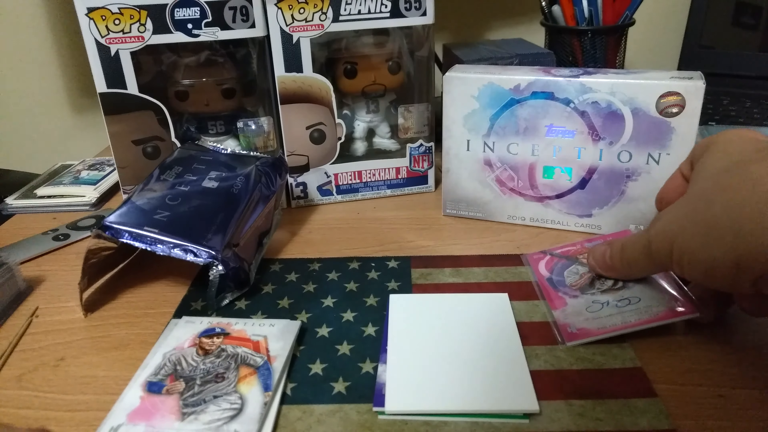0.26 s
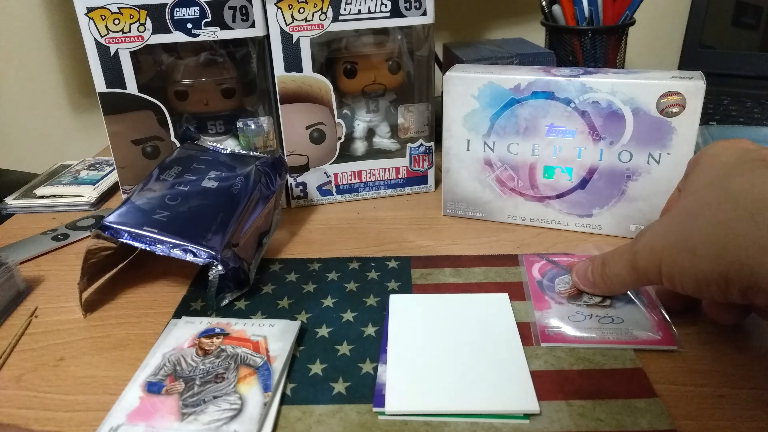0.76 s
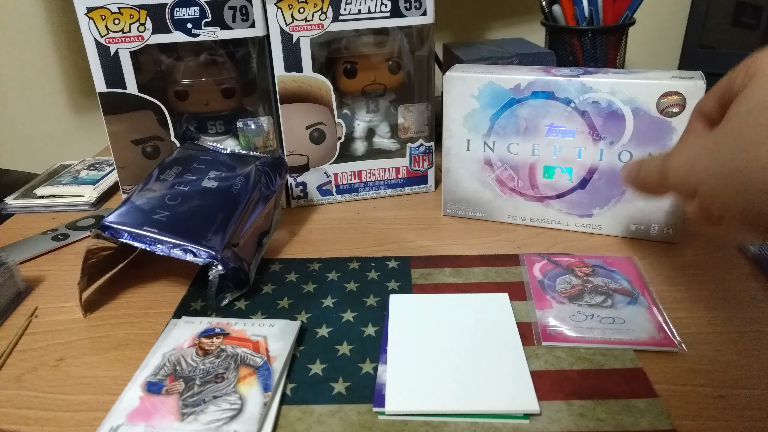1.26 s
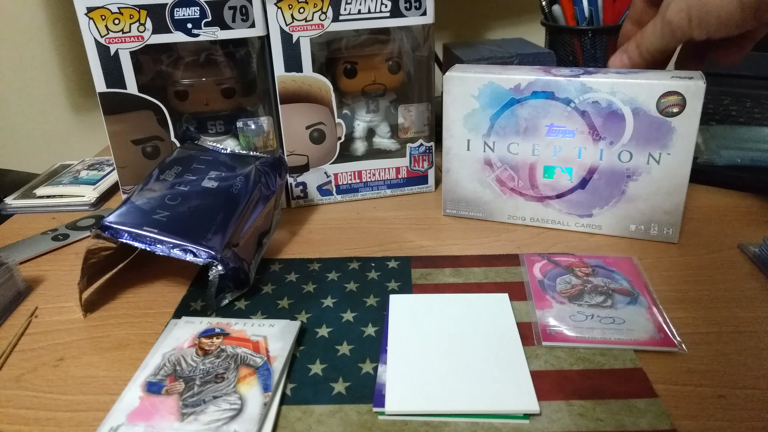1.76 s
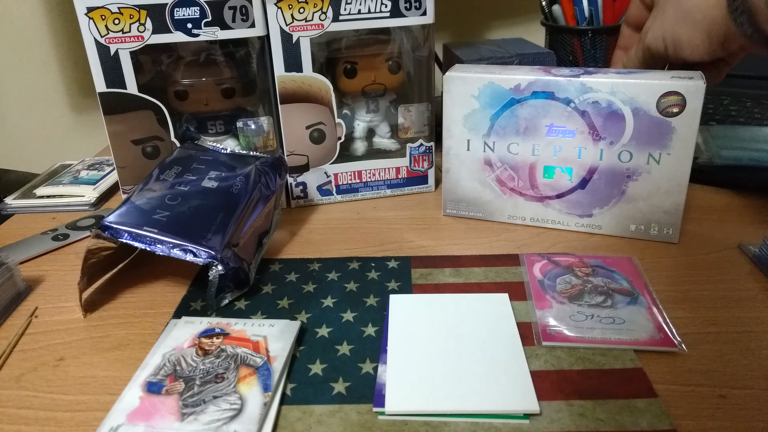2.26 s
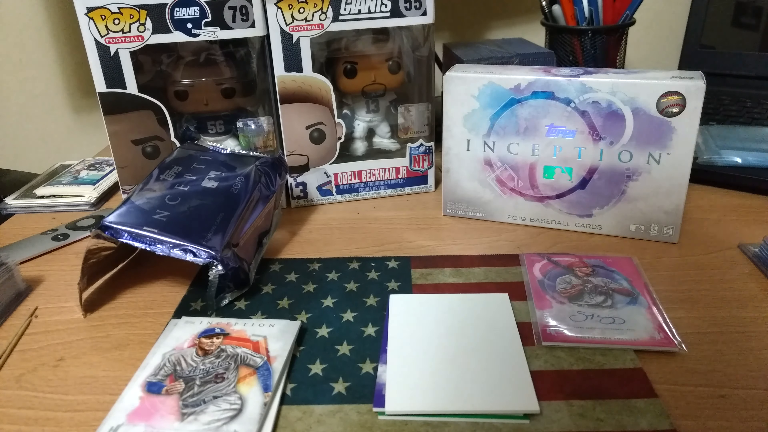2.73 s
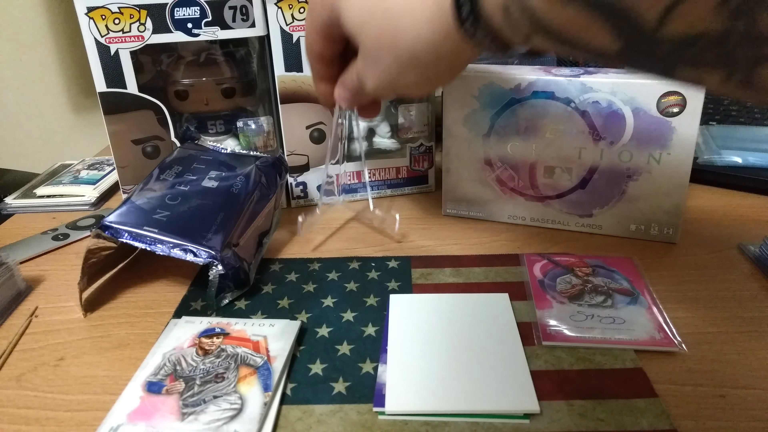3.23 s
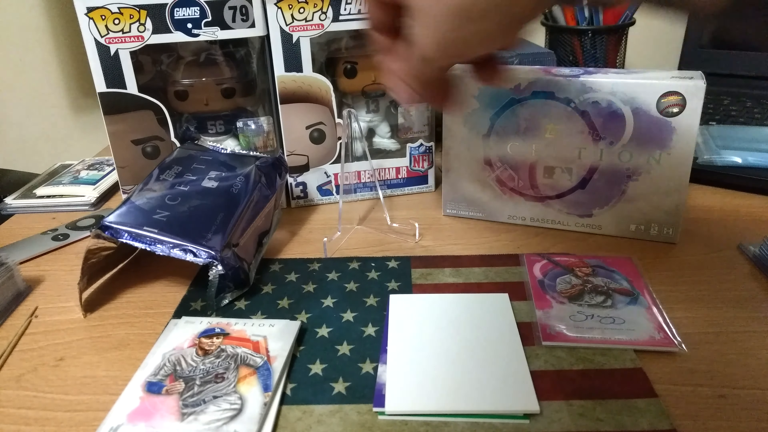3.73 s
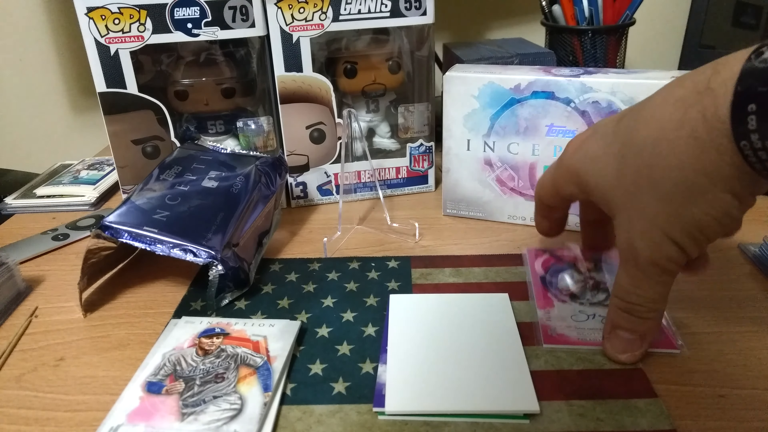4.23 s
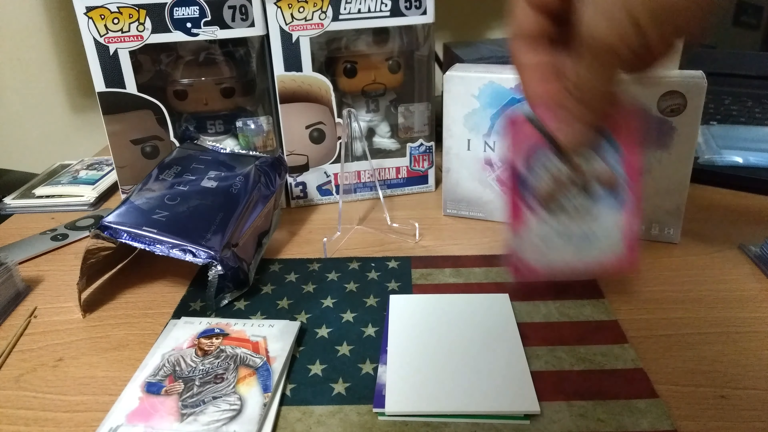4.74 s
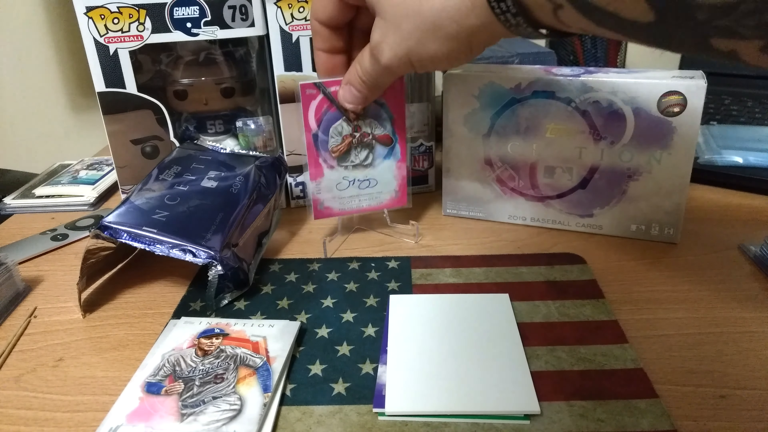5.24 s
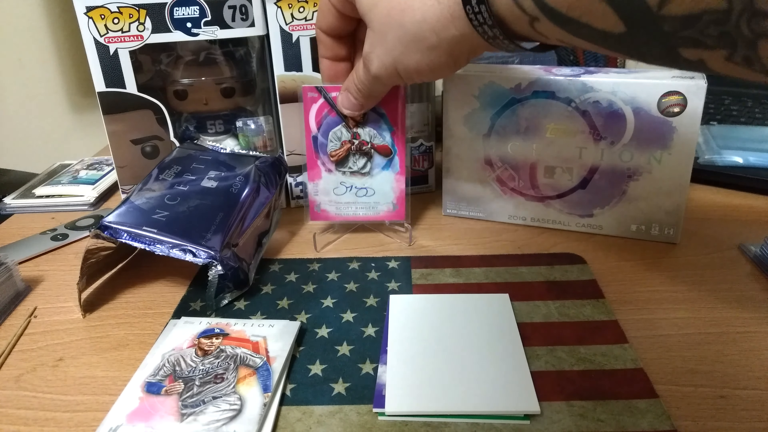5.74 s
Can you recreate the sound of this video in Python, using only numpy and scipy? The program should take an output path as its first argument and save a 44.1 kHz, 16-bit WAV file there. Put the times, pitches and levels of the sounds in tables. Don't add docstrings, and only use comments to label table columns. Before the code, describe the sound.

Quiet film rustles and snaps, dull cardboard bumps, hard plastic clacks and short drags on a desk, over a low fan hum.

```python
import sys
import numpy as np
from scipy import signal
from scipy.fft import rfft, irfft
from scipy.io import wavfile

SR = 44100
rng = np.random.default_rng(int(sys.argv[2]) if len(sys.argv) > 2 else 0)


def field_ratio(decibels):
    return 10 ** (np.asarray(decibels, dtype=float) / 20)


def master_out(mix):
    frames = np.transpose(np.atleast_2d(mix))
    ceiling = np.clip(frames, -1, 1)
    pcm = np.round(ceiling * 32767).astype(np.int16)
    wavfile.write(sys.argv[1], SR, pcm)


N = 264246


def rms_one(x):
    return x / np.sqrt(np.mean(x ** 2) + 1e-20)


def band(x, low_hz, high_hz):
    edges_hz = [low_hz, min(high_hz, .45 * SR)]
    return signal.sosfilt(signal.butter(2, edges_hz, "band", fs=SR, output="sos"), x)


def twins(alike):
    first, other = rng.standard_normal((2, N))
    alike = np.clip(alike, 0, 1)
    return np.array([first, alike * first + np.sqrt(1 - alike ** 2) * other])


def grains(per_s, spread_db):
    sizes = field_ratio(spread_db * np.minimum(rng.exponential(1, N), 4))
    sizes = sizes * rng.choice([-1, 1], N)
    return rms_one(sizes * (rng.random(N) < per_s / SR))


def ring(force, hz, t60):
    r, w = field_ratio(-60 / (t60 * SR)), 2 * np.pi * hz / SR
    return signal.lfilter([0, np.sin(w)], [1, -2 * r * np.cos(w), r * r], force + 1e-18)


def clicks(times, gains):
    out = np.zeros(N)
    out[(np.asarray(times) * SR).astype(int)] = gains
    return out


def bursts(times, levels_db, t60, alike=.9):
    starts = clicks(times, field_ratio(levels_db)) + 1e-18
    envelope = signal.lfilter([1], [1, -field_ratio(-60 / (t60 * SR))], starts)
    return envelope * twins(alike)


def in_time(spans):
    rows = []
    for span in spans:
        first, last = span[0], span[-1]
        rows += [(first[0] - .004, -120, *first[2:]), *span, (last[0] + .012, -120, *last[2:])]
    s, *columns = np.transpose(rows)
    return [np.interp(np.arange(N) / SR, np.maximum.accumulate(s), c) for c in columns]


def strokes(peak_s, swell_s, fade_s, peak_db):
    edge_db, roundness = 20, 1.17
    power, t = np.full(N, 1e-14), np.arange(N) / SR
    for s, swell, fade, db in zip(peak_s, swell_s, fade_s, peak_db):
        near = slice(max(int((s - 2 * swell) * SR), 0), int((s + 2 * fade) * SR))
        away = np.maximum((s - t[near]) / swell, (t[near] - s) / fade)
        power[near] += field_ratio(2 * (db - edge_db * away ** roundness))
    return 10 * np.log10(power)


def body(modes, times, hits_db, rub_db, slips, chatter_s):
    chatter = rng.standard_normal((len(times), 600)) * field_ratio(-60 * np.arange(600) / SR / chatter_s)
    chatter[:, 0] = 7
    blows = np.zeros(N)
    for s, db, shape in zip(times, hits_db, chatter):
        start = int(s * SR)
        blows[start:start + 600] += field_ratio(db) * shape / np.sqrt(np.sum(shape ** 2))
    even = np.sqrt(sum(field_ratio(2 * db) * t60 * SR / (4 * np.log(1000)) for hz, db, t60 in modes))
    force = band(blows + slips * field_ratio(rub_db) / even, .6 * modes[0][0], 1.4 * modes[-1][0])
    return sum(field_ratio(db) * (-1) ** k * ring(force, hz, t60) for k, (hz, db, t60) in enumerate(modes))


# freq_hz, level_db (per Hz)
AIR_SPECTRUM = [(25, -26), (55, 6.5), (130, -2), (300, -4), (700, -6.5), (1200, -11), (2000, -15.5),
                (4000, -20.5), (8000, -27.5), (11000, -28.5), (15500, -23.5)]
# centre_hz, width_hz, level_db
FAN_HUMS = [(59.4, 5, -80), (126, 20, -66), (207.4, 10.3, -60), (259.7, 28.5, -61.5), (475, 7.3, -82.5)]


def room_tone():
    hz, table = np.fft.rfftfreq(N, 1 / SR) + 1, np.array(AIR_SPECTRUM)
    colour = field_ratio(np.interp(np.log(hz), np.log(table[:, 0]), table[:, 1]))
    first, other = rfft(twins(0.22))
    shared = .5 / (1 + (hz / 500) ** 4)
    pair = [first, shared * first + np.sqrt(1 - shared ** 2) * other]
    out = field_ratio(-58) * rms_one(irfft(pair * colour, N))
    for centre_hz, width_hz, db in FAN_HUMS:
        out += field_ratio(db) * rms_one(ring(twins(0.77), centre_hz, np.log(1000) / (np.pi * width_hz)))
    return out


# firmest_s, swell_s, fade_s, peak_db, dullness_db
FILM_RUBS = [(.172, .02, .018, -62.5, -0.5), (.274, 0.11, 0.043, -59.5, -5.5),
             (.442, 0.11, 0.06, -66.5, -2), (.565, 0.063, .05, -61.5, -2.5),
             (.632, 0.11, .045, -59.5, -1.5), (.847, 0.008, 0.034, -58.5, -2.5),
             (.938, 0.02, 0.0055, -52, 4), (.955, .015, .09, -75, 8), (1.66, 0.36, 0.3, -75, 3.5),
             (2.272, .012, 0.034, -68, 2), (3.33, 0.2, 0.092, -74, 5.5), (4.09, 0.017, .05, -63.5, -7),
             (4.25, .03, 0.027, -69.5, -3), (4.395, .04, 0.14, -56.5, 0), (4.431, 0.023, 0.014, -41.5, -7),
             (4.509, 0.15, 0.05, -49.5, -10.5), (4.62, 0.32, .12, -63, -9), (4.694, 0.061, .008, -53, -8.5),
             (4.71, 0.0044, 0.0099, -48, -12), (5.045, 0.04, 0.024, -62, -3), (5.556, 0.074, .045, -67, -2),
             (5.88, .012, .07, -79, -11)]
# start_s, peak_db, top_db and lower_db (both relative to peak)
FILM_SNAPS = [(0.127, -59.5, 17, 8), (0.1681, -51.5, -6, 7), (0.1774, -56, -7, -1),
              (0.206, -48.5, -12, -14), (0.216, -51, 1, -12), (0.242, -48, 1, -17), (0.26, -51, 2, -12),
              (0.2717, -45, -1, -25), (0.2935, -44, -18, -21), (0.3084, -58, -12, -11), (0.844, -62, 0, -3),
              (0.867, -62, -7, 15.5), (0.9104, -55, 4, -4), (0.9373, -41, 3, -23), (1.192, -53, 8, 12),
              (4.078, -57, 8, 3), (4.1043, -48.5, -8, -0.5), (4.1504, -53, -10, -3), (4.335, -62, -1, 0),
              (4.346, -54, -4, -4), (4.37, -35, 1, -3.5), (4.39, -44.5, -10, 9), (4.4316, -39.5, -5, 7),
              (4.699, -52, -3, -7), (4.708, -41.5, 6.5, -3), (5.48, -61, 12, 0), (5.7892, -58, 3, 7),
              (5.832, -54, -10, -4), (5.8402, -42.5, 2, 6.5), (5.8639, -38.5, 9.5, 6.5)]


def sleeve():
    *when, grip_db, dull_db = np.transpose(FILM_RUBS)
    fine_db, lower_db = strokes(*when, grip_db), strokes(*when, grip_db + dull_db)
    hiss_db = fine_db - 8
    slips = .5 * grains(2500, spread_db=4.5) + twins(.85)
    rub = -field_ratio(hiss_db + 3) * rms_one(band(slips, 7800, 11500))
    rub += field_ratio(fine_db + 6) * rms_one(band(slips, 11500, 19000))
    rub += field_ratio(lower_db + 3) * rms_one(band(slips, 3000, 7800))
    s, peak_db, top_db, low_db = np.transpose(FILM_SNAPS)
    snap = band(bursts(s, peak_db + 8, t60=.008, alike=.97), 6000, 11500)
    snap += band(bursts(s, peak_db + top_db + 9, t60=.008, alike=.97), 11500, 19000)
    snap += band(bursts(s, peak_db + low_db + 5.0, t60=0.0098), 700, 4500)
    return rub + snap


# start_s, pitch_hz, level_db
SQUEAK_GLIDES = [
    [(2.263, 6100, -75), (2.272, 6050, -48), (2.285, 5950, -59), (2.294, 5720, -50), (2.305, 5700, -68),
     (2.316, 5680, -61), (2.35, 5650, -76)],
    [(.49, 14000, -80), (.52, 14300, -74), (.55, 14800, -61), (.58, 15000, -77)],
]


def squeaks():
    spans = [[(s, db, hz) for s, hz, db in rows] for rows in sorted(SQUEAK_GLIDES)]
    level_db, hz = in_time(spans)
    waver, grip = rms_one(signal.lfilter([1], [1, -.95], rng.standard_normal((2, N))))
    phase = 2 * np.pi * np.cumsum(hz + 120 * waver) / SR
    octave = field_ratio(-3.5) * (4 * hz < SR) * np.sin(2 * phase)
    return field_ratio(level_db + 3.5 + 2.6 * grip) * (np.sin(phase) + octave)


# start_s, board_db, grit_db (relative to board)
CARTON_SCRAPE = [
    (1.958, -35, -3),
    (2.016, -38.5, -15),
    (2.026, -46.5, -7),
    (2.086, -66, -9),
    (2.102, -49, -25),
    (2.13, -70, -11),
]
# start_s, peak_db
CARTON_KNOCKS = [
    (1.959, -31),
    (1.978, -30),
    (2.002, -30),
    (2.02, -40),
]
# freq_hz, level_db, t60_s
PANEL_MODES = [(240, -21, 0.053), (412, -4, 0.15), (679.6, -4, 0.086), (1057, 0, 0.044), (1350, 4.5, 0.013),
               (1660, -4, 0.021), (2820, -6, 0.012), (4080, -1, 0.0074), (5450, -11, 0.017),
               (6250, -17, 0.022)]


def carton():
    s, peak_db = np.transpose(CARTON_KNOCKS)
    board_db, grit_db = in_time([CARTON_SCRAPE])
    slips = grains(4000, spread_db=3)
    panels = body(PANEL_MODES, s, peak_db - 9, board_db - 1.5, slips, chatter_s=.01)
    rumble = field_ratio(board_db - 6) * rms_one(band(twins(0.68), 145, 3700))
    grit = field_ratio(board_db + grit_db - 1.0) * rms_one(band(slips + twins(0.27), 2300, 19500))
    crack = band(bursts(s, peak_db - 5.0, t60=0.014), 2100, 25000)
    return panels + rumble + grit + crack


# start_s, base_peak_db, frame_db, tips_db, crack_db
EASEL_KNOCKS = [(2.102, -40.5, -63, -76, -70), (2.361, -31.5, -43, -31, -35.5),
                (2.373, -39, -51, -31.5, -40.5), (3.3714, -19, -35, -30.5, -60),
                (3.394, -29, -36, -31, -58), (3.4399, -25, -39, -45, -59), (3.4475, -22.5, -28, -49, -59),
                (3.558, -36.5, -44, -64, -64), (3.593, -26.5, -31, -54, -63), (3.605, -40, -42, -56, -64),
                (5.483, -36, -48, -72, -70), (5.648, -27, -36.5, -66, -66), (5.667, -28, -33, -65, -53.5),
                (5.675, -26, -29.5, -68, -59), (5.698, -33, -45, -67, -61)]
# firmest_s, swell_s, fade_s, peak_db, legs_db
EASEL_STROKES = [(2.386, 0.0066, .05, -58, -6), (3.404, 0.013, 0.025, -36.5, -12.5),
                 (3.429, 0.057, 0.013, -37.5, -19), (3.457, .005, .03, -60, -18),
                 (3.568, 0.014, .025, -42, -33), (3.61, 0.0076, 0.022, -42.5, -22),
                 (4.433, .01, .008, -52, -20), (5.488, 0.01, 0.012, -42, -40),
                 (5.532, 0.013, 0.017, -48, -26), (5.549, .006, 0.038, -41, -12),
                 (5.575, .04, 0.018, -49, -7), (5.6, 0.037, 0.01, -46.5, -7), (5.681, .006, 0.03, -33.5, -29)]
# freq_hz, level_db, t60_s
BASE_MODES = [(300, -16, .04), (458, -15, .05), (640, -6, .025), (730, -1, .04), (870, -1, .04),
              (1007, -2, .025)]
FRAME_MODES = [(1290, -4, .025), (1435, -1, .04), (1717, -5, .06), (1895, -4, .045), (2137, -7, .045),
               (2300, -12, .02)]
LEG_MODES = [(2550, -10, .03), (3175, -2, .03), (3300, -3, .028), (3560, -7, .016), (3910, -8, .018)]
TIP_MODES = [(4750, -5, .01), (5230, -6, .085), (5600, -8, .012), (6400, -20, .035), (9150, -22, .03),
             (10870, -24, .045)]


def easel():
    low_side_db = -5.5
    s, base_db, frame_db, tips_db, crack_db = np.transpose(EASEL_KNOCKS)
    legs_db = crack_db - 4.5
    *when, grip_db, share_db = np.transpose(EASEL_STROKES)
    low_db, high_db = strokes(*when, grip_db), strokes(*when, grip_db + share_db)
    slips = grains(3000, spread_db=4)
    # modes, knock dB, drag dB, gain dB (in sum and difference)
    parts = [(BASE_MODES, base_db, low_db, [[-5], [low_side_db - 4.5]]),
             (FRAME_MODES, frame_db, low_db - 6.5, [[0], [low_side_db]]),
             (LEG_MODES, legs_db, high_db, 2),
             (TIP_MODES, tips_db, high_db - 18, 0)]
    rings = np.zeros((2, N))
    for modes, knock_db, drag_db, gain_db in parts:
        rings += field_ratio(gain_db) * body(modes, s, knock_db + 3.0, drag_db + 4.5, slips, chatter_s=.003)
    crack = band(bursts(s, crack_db + 7, t60=.03), 6000, 17000)
    crack += band(bursts(s, np.maximum(legs_db, tips_db) + 3, t60=.03), 2400, 6500)
    thud = band(bursts(s, frame_db + 8, t60=.022, alike=.95), 500, 2200)
    thud += band(clicks(s, field_ratio(base_db + 17.5)), 520, 1780)
    return rings + crack + thud * field_ratio([[0], [low_side_db]])


def room(x):
    t60_s, wet_db, wall_cut_hz = 0.17, -15, 9400
    t = np.arange(SR // 2) / SR
    tail = rng.standard_normal((2, len(t))) * field_ratio(-60 * t / t60_s) * (t > .003)
    tail = signal.sosfilt(signal.butter(1, wall_cut_hz, fs=SR, output="sos"), tail)
    tail = field_ratio(wet_db) * tail / np.sqrt(np.sum(tail[0] ** 2))
    return signal.fftconvolve(x, tail, axes=1)[:, :N]


def scene():
    desk = sleeve() + squeaks() + carton() + easel()
    return desk + room(desk) + room_tone()


CONVERTER_OFFSET = [
    [.00776],
    [-.0003],
]


def roll_off(x):
    return signal.sosfilt(signal.butter(12, 16700, fs=SR, output="sos"), x)


def record(dry):
    comb_hz = 2211
    left_top_cut_hz, right_bass_cut_hz = 6300, 175
    hz = np.fft.rfftfreq(N, 1 / SR)
    left = -np.exp(-2j * np.pi * hz / comb_hz) / (1 + (hz / left_top_cut_hz) ** 2)
    pitch = 1j * hz / right_bass_cut_hz
    right = pitch ** 2 / (1 + 1.5 * pitch + pitch ** 2)
    mid = irfft(rfft(dry[0]) * (left + right) / 2, N)
    side = irfft(rfft(dry[1]) * (left - right) / 2, N)
    whine = field_ratio(-88) * np.sin(2 * np.pi * 13640 * np.arange(N) / SR)
    ports = np.array([mid + side + whine, mid - side])
    ports = signal.sosfilt(signal.ellip(9, .5, 32, 15850, fs=SR, output="sos"), ports)
    return roll_off(ports + CONVERTER_OFFSET)


dry = scene()
out = record(dry)
master_out(out)
```